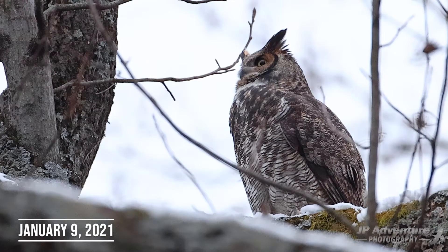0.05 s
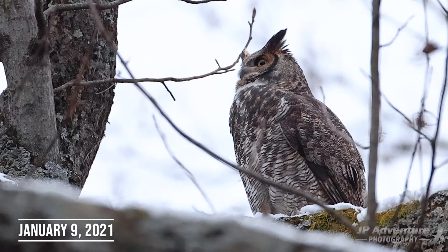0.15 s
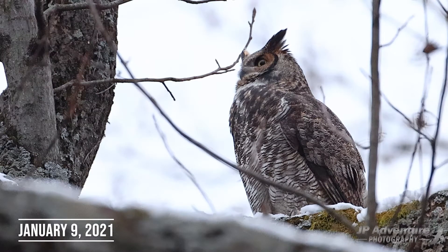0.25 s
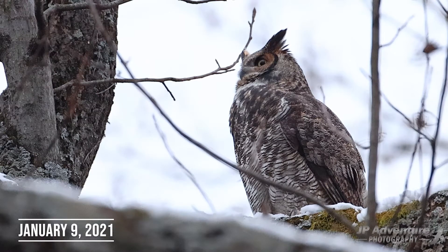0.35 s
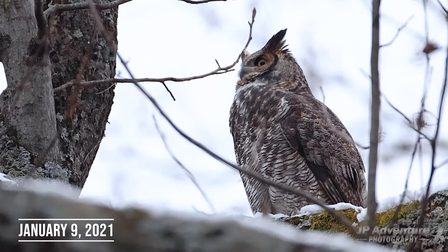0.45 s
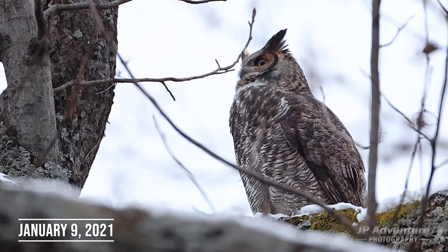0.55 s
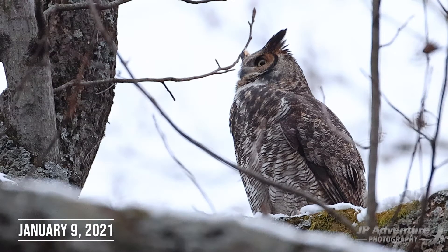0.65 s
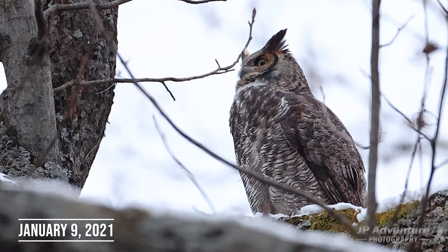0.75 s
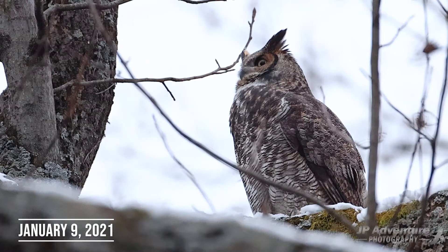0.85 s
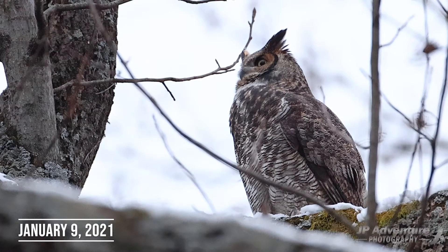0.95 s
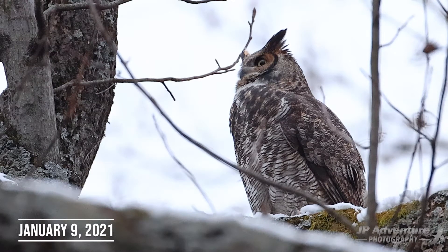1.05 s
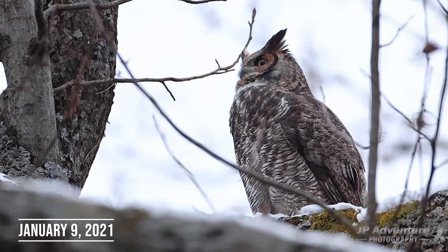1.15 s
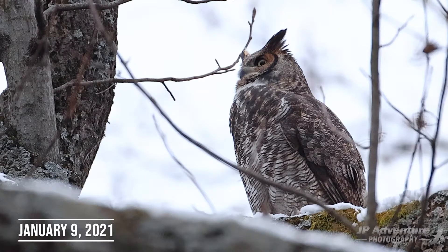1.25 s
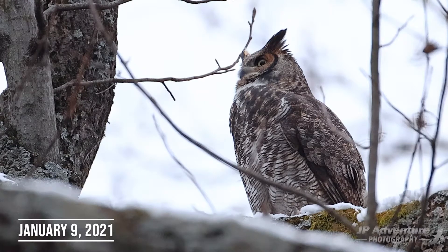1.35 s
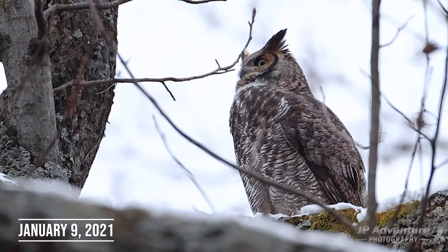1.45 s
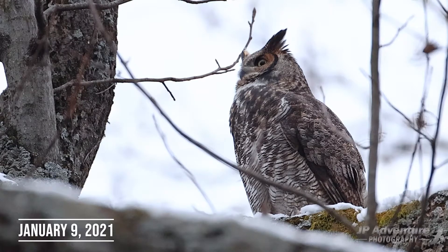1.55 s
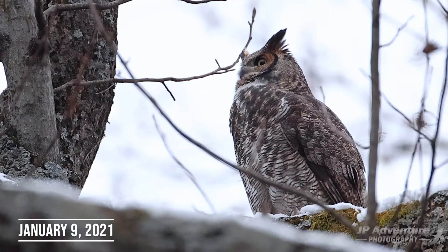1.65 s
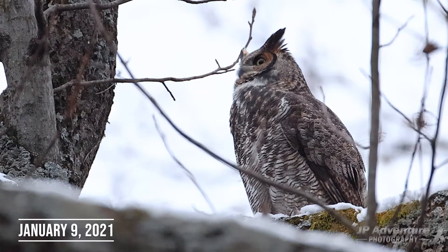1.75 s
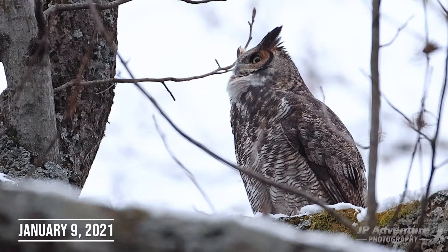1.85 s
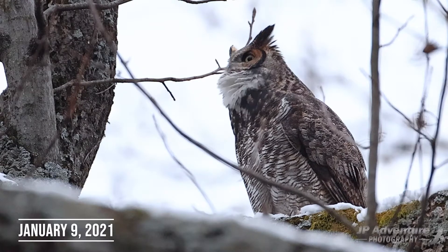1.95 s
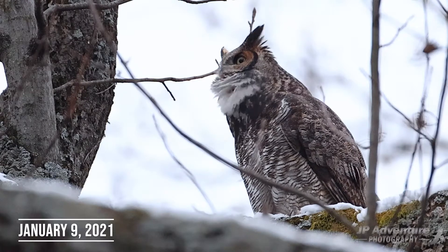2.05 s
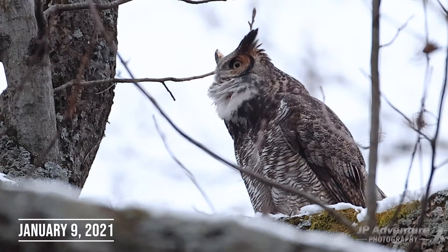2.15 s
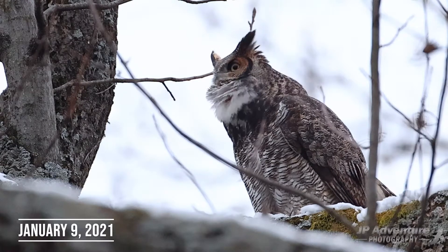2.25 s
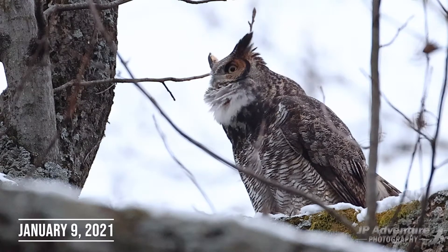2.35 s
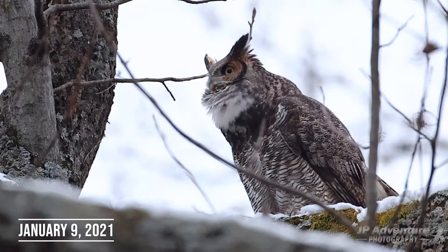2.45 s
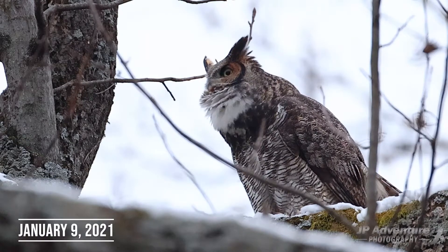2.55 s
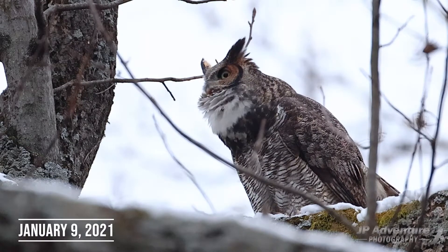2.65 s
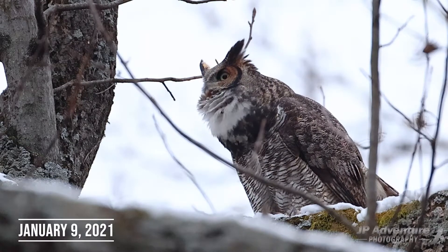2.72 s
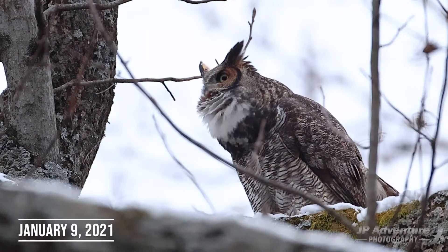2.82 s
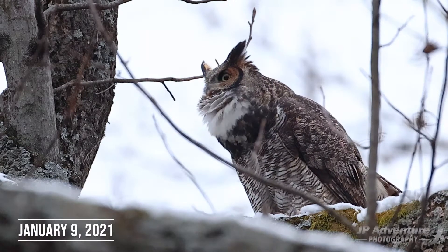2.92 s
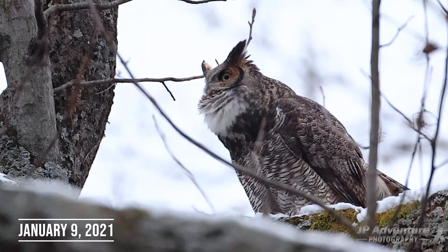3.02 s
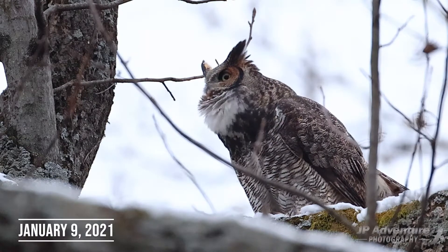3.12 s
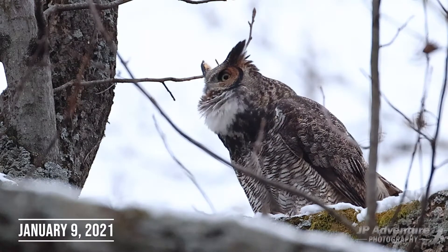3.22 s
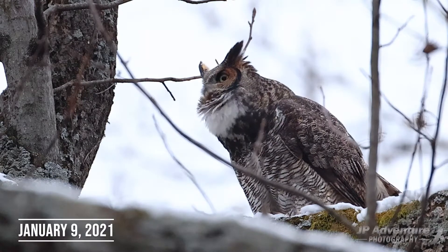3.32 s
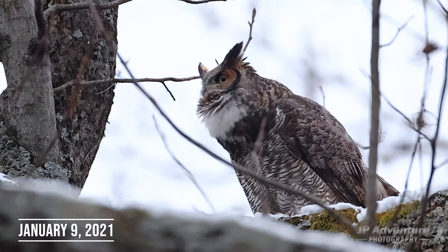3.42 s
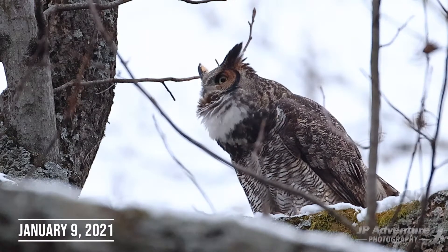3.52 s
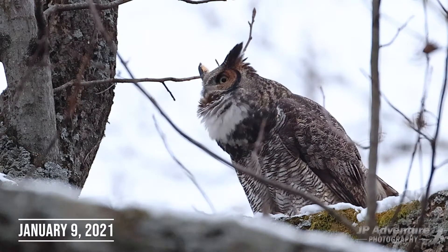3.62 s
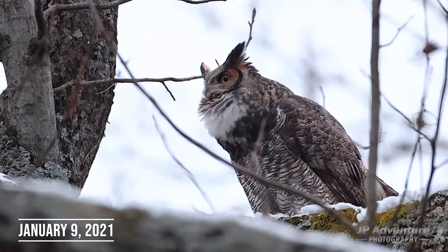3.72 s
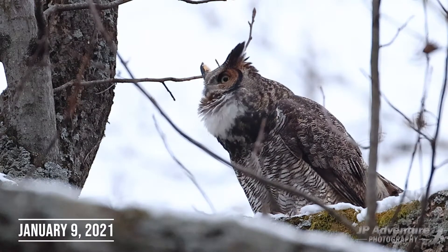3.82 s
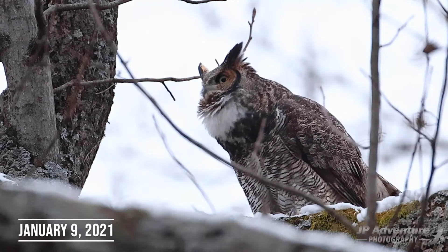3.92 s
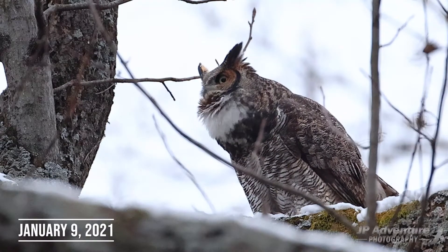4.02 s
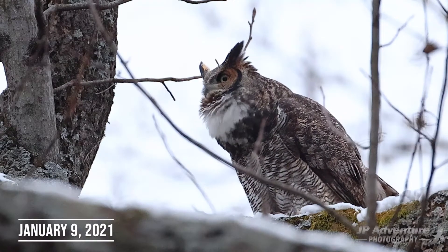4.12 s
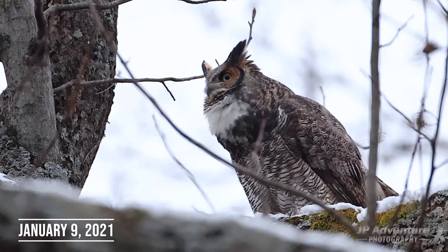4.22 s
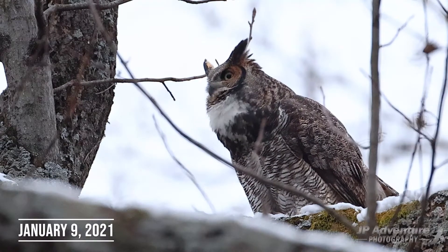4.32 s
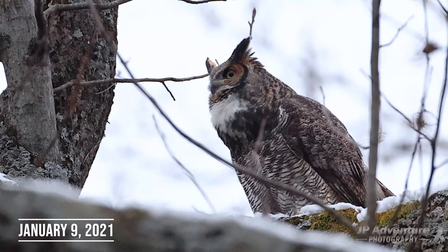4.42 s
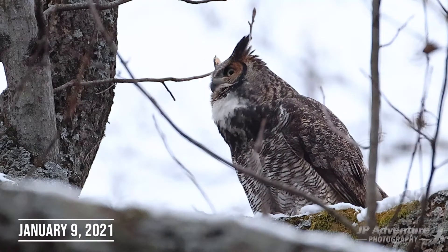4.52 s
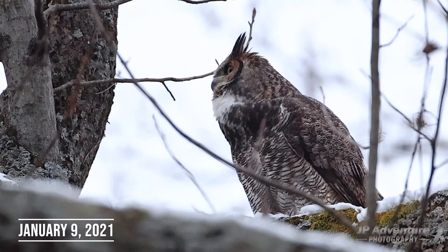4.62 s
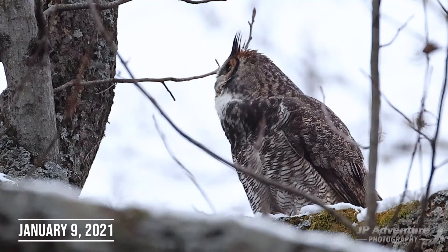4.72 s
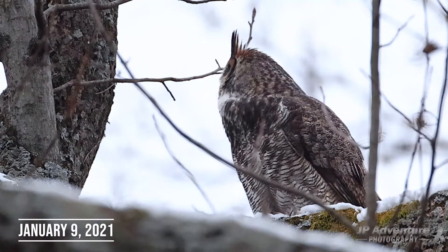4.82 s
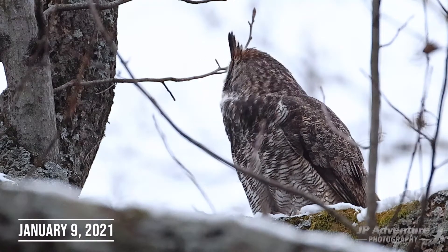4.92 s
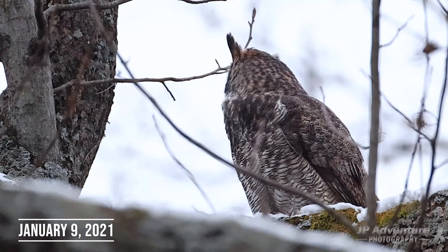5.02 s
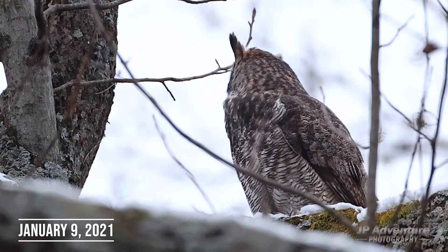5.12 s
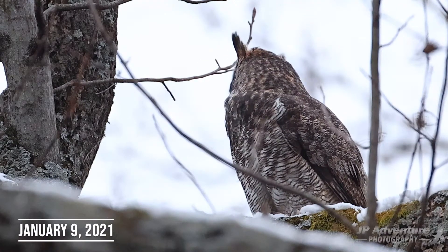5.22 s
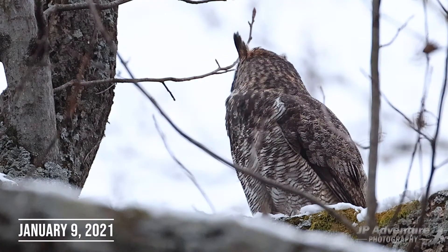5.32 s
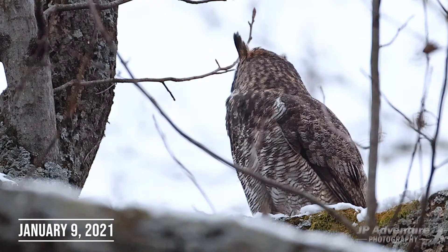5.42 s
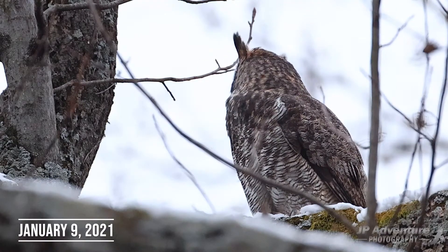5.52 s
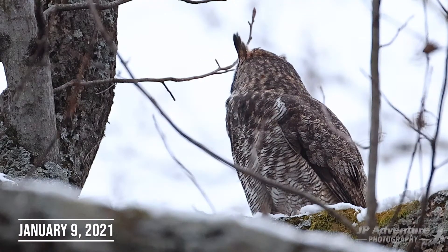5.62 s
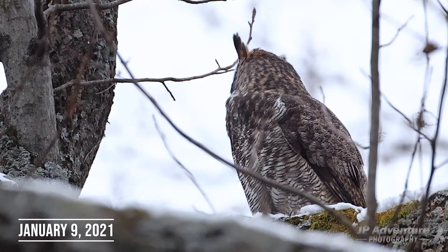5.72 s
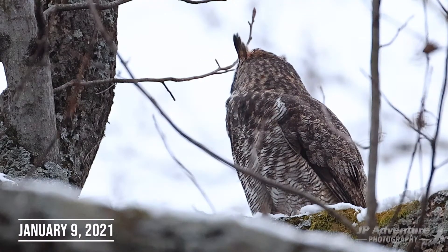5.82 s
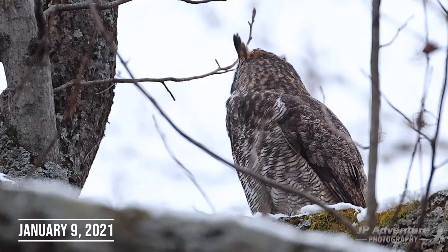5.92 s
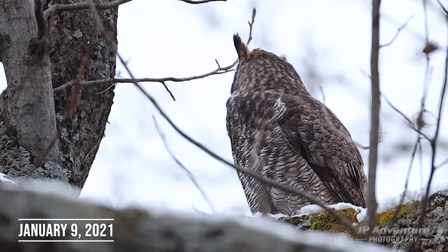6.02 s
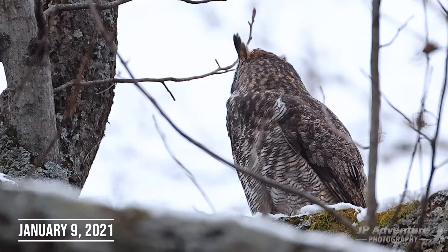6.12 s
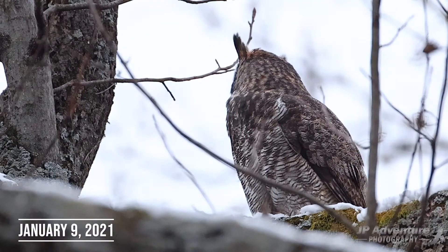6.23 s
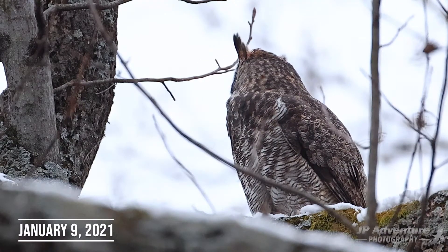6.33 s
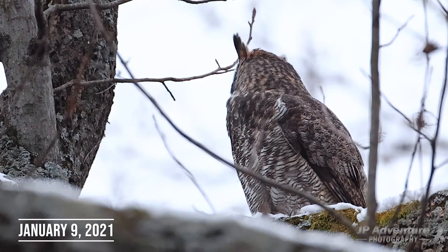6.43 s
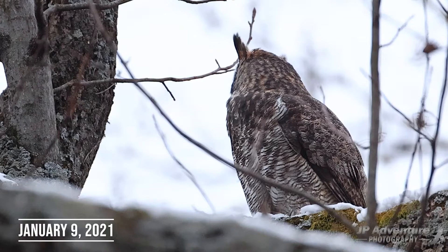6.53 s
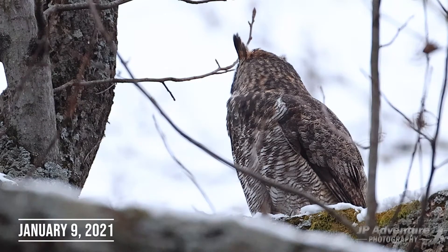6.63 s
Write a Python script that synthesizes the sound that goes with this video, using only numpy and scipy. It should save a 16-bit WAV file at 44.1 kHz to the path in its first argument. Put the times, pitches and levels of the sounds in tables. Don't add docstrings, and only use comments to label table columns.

```python
import sys
import numpy as np
from scipy import signal
from scipy.fft import rfft, irfft
from scipy.io import wavfile
from scipy.ndimage import uniform_filter1d

SR = 44100
rng = np.random.default_rng(int(sys.argv[2]) if len(sys.argv) > 2 else 0)


def waveform_to_disk(signal):
    frames = np.transpose(np.atleast_2d(signal))
    scaled = np.clip(frames, -1, 1) * 32767
    samples = np.round(scaled).astype(np.int16)
    wavfile.write(sys.argv[1], SR, samples)


def amplitude_ratio(level_db):
    exponent = np.asarray(level_db, float) / 20
    return 10 ** exponent


N = 294147
SKIP_AT_S, SKIP_S = 1.2713, .045


def evened(x):
    return x / np.sqrt(np.mean(x ** 2) + 1e-20)


def read(points, hz):
    f, value = np.transpose(points)
    return np.interp(np.log(hz + 1), np.log(f + 1), value)


def add(mix, s, sound):
    part = mix[round(s * SR):][:len(sound)]
    part += sound[:len(part)]


def resonate(x, hz, width):
    turn = np.exp(2j * np.pi * np.cumsum(hz * np.ones(len(x))) / SR)
    r = np.exp(-np.pi * width / SR)
    smooth = signal.lfilter([1 - r], [1, -r], x / turn + 1e-18)
    return 2 * (turn * smooth).real


def band(x, kind, hz):
    return signal.sosfilt(signal.butter(6, hz, kind, fs=SR, output="sos"), x)


def ducking():
    # (start [s], duration [s], drop
    # [dB])
    ducks = [(.785, 0.018, 6), (1.15, .04, 2.5), (1.27, 0.057, 5), (1.33, 0.27, 1), (2.2, 0.36, 5),
             (2.62, .03, 4), (2.65, 0.21, 0), (2.87, .11, 4.5), (3.422, .2, .5), (3.63, .2, 4.5),
             (4.17, 0.15, 1.5)]
    recover_db_per_s, ease_db = 12.5, 3
    t = np.arange(0, N / SR + .01, .005)
    start, lasts, drop_db = np.transpose(ducks)[:, :, None]
    done = np.diff(np.clip((t - start) / lasts, 0, 1), prepend=0)
    fall = (drop_db * done).sum(0)
    free = np.clip(.005 - (lasts * done).sum(0), 0, 1)
    gain = np.zeros(len(t))
    for k in range(1, len(t)):
        recovery = free[k] * recover_db_per_s * np.tanh(-gain[k - 1] / ease_db)
        gain[k] = gain[k - 1] - fall[k] + recovery
    return np.interp(np.arange(N) / SR, t, gain)


def background():
    # (frequency [Hz], density [dB per Hz])
    hum = [(12, -52.5), (20, -31), (48, -5.5), (98, 2), (210, -9.5), (277, -9.5), (310, -9), (377, -13),
           (642, -10), (949, -11), (1400, -17.5), (2530, -36), (11400, -44), (14700, -45), (16000, -51)]
    # (middle [s], half length [s], level [dB])
    gusts = [
        (1.2, .25, 1.5),
        (1.55, .15, 4),
        (2.5, .12, 3),
        (4.2, .15, 3),
        (5.15, .12, 1.5),
        (5.558, .13, 3.5),
    ]
    wind_hz, hiss_edge_hz = 207, 15930
    traffic_db, wind_db = -38.5, -33
    frames, hz, t = N // 512 + 5, np.fft.rfftfreq(2048, 1 / SR), np.arange(N) / SR
    a, b, patches = rng.standard_normal((frames, 1025, 3)).T
    patches = uniform_filter1d(patches, size=12, axis=0)
    patches = evened(uniform_filter1d(patches, size=8, axis=1))
    patchy_db = 0.87 / (1 + (hz[:, None] / 2500) ** 2)
    density = amplitude_ratio(read(hum, hz)[:, None] + patchy_db * patches)
    z = (a + 1j * b) * density * (hz < hiss_edge_hz)[:, None]
    low = 1 / (1 + (hz[:, None] / wind_hz) ** 6)
    wind, rest = (signal.istft(z * w, nperseg=2048, noverlap=1536)[1][:N] for w in (low, 1 - low))
    rest /= np.std(band(band(rest, "high", 1000), "low", 1500))
    wind = evened(band(wind, "high", 43))
    gusts_db = sum(db * np.exp(-((t - s) / half) ** 2) for s, half, db in gusts)
    return amplitude_ratio(ducking()) * (rest * amplitude_ratio(traffic_db) + wind * amplitude_ratio(wind_db + gusts_db))


def bumps():
    # (time [s], peak level [dB], frequency [Hz])
    pushes = [
        (5.185, -28, 170.2),
        (5.252, -25, 200),
        (5.276, -26, 190),
        (5.465, -23, 182),
        (5.487, -20.5, 164),
    ]
    out, t = np.zeros(N), np.arange(1200) / SR
    for s, db, hz in pushes:
        pulse = np.hanning(len(t)) ** 2 * np.cos(2 * np.pi * hz * t)
        add(out, s - .012, amplitude_ratio(db) * pulse)
    return out


def bird():
    # (start [s], length [s], level [dB], centre frequency [Hz])
    calls = [
        (1.133, .135, -46.5, 3500),
        (6.151, .21, -41, 3520),
    ]
    attack_s, scoop, fade_db, sag = 0.018, .86, 12, .035
    partials = [(.92, 0.6), (1.01, .9), (1.08, .7)]
    out = np.zeros(N)
    for s, length, db, centre_hz in calls:
        t = np.arange(0, length, 1 / SR)
        rise = np.minimum(t / attack_s, 1)
        hz = centre_hz * (scoop + (1 - scoop) * rise - sag * t / length)
        rasp = np.zeros(len(t))
        for share, gain in partials:
            air = rng.standard_normal(len(t))
            rasp += gain * resonate(resonate(air, hz * share, 150), hz * share, 150)
        envelope = rise ** 2 * amplitude_ratio(db - fade_db * t / length) * signal.windows.tukey(len(t), .1)
        add(out, s, envelope * evened(rasp))
    return out


def trees(seconds):
    # (frequency [Hz], decay time t60 [s])
    decay = [(200, 0.8), (500, 1.3), (1500, 0.24), (4000, 0.23), (9000, 0.21), (16000, 0.21)]
    taps = np.zeros(int(seconds * SR))
    at = np.arange(100, len(taps) - 20, 20)
    taps[at + rng.integers(0, 20, len(at))] = rng.choice([-1., 1.], len(at))
    hz, t, z = signal.stft(taps, SR, nperseg=256)
    return signal.istft(z * amplitude_ratio(-60 * t / read(decay, hz)[:, None]), SR, nperseg=256)[1]


def scatter():
    tail = band(trees(.3), "high", 1500)
    clumps = evened(uniform_filter1d(rng.standard_normal(len(tail)), size=120))
    tail = tail * amplitude_ratio(2.6 * clumps)
    return tail / np.linalg.norm(tail)


def causal(gain):
    log_gain = np.log(np.maximum(np.r_[gain, gain[-2:0:-1]], 1e-5))
    return np.exp(log_gain - 1j * signal.hilbert(log_gain).imag)[:len(gain)]


def snap(gain, length, wet_db, tail):
    t = np.arange(1024) / SR
    burst = rfft(rng.standard_normal(len(t)) * np.exp(-t / length))
    crack = irfft(burst / causal(abs(burst)) * causal(gain))
    crack = crack + 0.24 * np.roll(crack, shift=64)
    smooth_gain = np.sqrt(abs(uniform_filter1d(gain ** 2, size=28)))
    sound = amplitude_ratio(wet_db) * signal.fftconvolve(irfft(causal(smooth_gain)), tail)
    sound[:len(t)] += crack
    return sound / abs(crack).max()


def ticks(tails):
    # (time [s], peak level [dB], ring
    # frequency [Hz])
    close = [(0.2158, -26, 5600), (.3263, -33, 5530), (1.483, -45, 7000), (2.030, -19, 5200),
             (2.6076, -36, 9000), (2.873, -19, 5500), (2.8805, -13, 3790), (3.3546, -35.5, 5500),
             (3.413, -22.5, 5000), (4.1336, -42, 5000), (4.204, -49, 6530), (4.242, -46, 6500),
             (4.2513, -36, 5000), (4.267, -45.5, 6300), (4.9065, -23, 3020), (5.003, -31, 5000),
             (5.1184, -41, 3970), (5.697, -37, 6500), (6.29, -26, 3980), (6.326, -33, 6500)]
    # (time [s], peak level [dB], ring frequency [Hz])
    icy = [
        (1.2728, -33, 5360),
        (2.8678, -27, 12900),
        (4.88, -26, 2800),
    ]
    # (time [s], peak level [dB], ring frequency [Hz])
    distant = [
        (3.372, -34.5, 4500),
        (4.188, -42.5, 5000),
        (4.889, -29, 4510),
        (4.968, -34.5, 5500),
        (5.567, -34, 6450),
        (5.592, -27, 5000),
        (5.628, -33, 4500),
    ]
    # (ring width [share of frequency], scatter level [dB])
    kinds = [
        (.45, -6),
        (.13, -9.5),
        (0.55, 9),
    ]
    out, hz = np.zeros(N), np.fft.rfftfreq(1024, 1 / SR)
    for events, (share, wet_db) in zip((close, icy, distant), kinds):
        for k, (s, db, ring_hz) in enumerate(events):
            ring = np.exp(-((hz / ring_hz - 1) / share) ** 2)
            add(out, s, amplitude_ratio(db) * snap(ring, 0.00026, wet_db, tails[k % len(tails)]))
    return out


def snaps(tails):
    # (time [s], peak level [dB], crack length [s], scatter level [dB])
    cracks = [
        (1.9264, -2, 0.00066, -6.5),
        (2.039, -7, .0006, -7),
        (2.867, -3, .0016, -9),
        (3.4007, -9.5, 0.00055, -8),
        (4.9008, -16, 0.000795, -3.5),
        (5.556, -28.5, 0.00089, 13),
    ]
    # (frequency [Hz], density [dB per Hz])
    colours = [
        [(880, -38), (1690, 2.5), (1880, -13.5), (2570, -3), (3720, 1.5), (4170, -8.5), (6890, -10),
         (8300, -31), (16000, -96)],
        [(1530, -32), (3030, -11), (3770, -10.5), (4420, 3), (5310, -13), (5920, 3.5), (7360, -12), (8010, -26),
         (16000, -100)],
        [(1300, -34.5), (1840, 1), (2260, -27), (2580, -0.5), (3300, 0.5), (6080, -17), (7300, -2.5),
         (10100, -20), (16000, -51.5)],
        [(1410, -35), (2630, -7), (3140, 6), (4230, 0), (4680, -5.5), (5170, 0.5), (6760, -6.5), (9300, -25.5),
         (15000, -31)],
        [(1240, -38), (2100, -13), (2480, 5.5), (2780, -7), (4300, -10.5), (7230, -8.5), (7800, -14.5),
         (10700, -11.5), (13000, -28)],
        [(1180, -34), (2000, 2), (3090, -9), (3940, -4), (4770, -16), (6860, -5), (8300, -26), (10800, -54),
         (16000, -100)],
    ]
    out, hz = np.zeros(N), np.fft.rfftfreq(1024, 1 / SR)
    for (s, db, length, wet_db), colour, tail in zip(cracks, colours, tails):
        add(out, s, amplitude_ratio(db) * snap(amplitude_ratio(read(colour, hz)), length, wet_db, tail))
    return out


def gesture(notes, onset, ending, rules):
    slurred_sag = (0.3, 0.9)
    break_db = 8
    overshoot, settle_s = .03, .035
    attack, release, slur, rest_hz, drift, arch, droop = rules
    rows = []
    for s, syllables in notes:
        s = s + SKIP_S * (s > SKIP_AT_S)
        _, hz, db, _ = syllables[0]
        rows = [r for r in rows if r[0] < s - .004]
        rows += [(s - .004, hz * onset[0][1], -90)]
        rows += [(s + a * attack, hz * p, db + d) for a, p, d in onset]
        for k, (length, hz, db, sag_db) in enumerate(syllables):
            join, fall = min(slur, length / 3.5), min(release, length / 2)
            early, half = slurred_sag if k else (0, .62)
            if k:
                before_hz = rows[-1][1]
                rows += [(s + join, (before_hz + hz) / 2, db - break_db * (hz < .9 * before_hz))]
            first = s + (2 * join if k else attack)
            last = max(s + length - fall * (k == len(syllables) - 1), first + .002)
            end_hz = hz * (1 - droop * sag_db) + drift * (hz - rest_hz) * (last - first)
            sharp = k and hz > 1.05 * syllables[k - 1][1]
            if sharp and last - first > 2.2 * settle_s:
                rows += [(first + settle_s, hz, db - (early + half) / 2 * sag_db)]
            rows += [(first, hz * (1 + overshoot * sharp), db - early * sag_db)]
            rows += [((first + last) / 2, (hz + end_hz) / 2 * (1 + arch), db - half * sag_db)]
            rows += [(last, end_hz, db - sag_db)]
            s = s + length
        for a, p, d in ending:
            rows += [(last + a * fall, end_hz * (1 - (1 - p) * fall / release), db - sag_db + d)]
        rows += [(last + fall + .004, rows[-1][1], -90)]
    return np.transpose(sorted(rows))


def owl(course, octave_law, throat_db, slack_db):
    fill_s = .16
    octave_flutter_db, waver = 3, .006
    s, hz, level_db = course
    t = np.arange(N) / SR
    clock = t + SKIP_S * (t > SKIP_AT_S)
    hz, level = (uniform_filter1d(np.interp(clock, s, c), size=300) for c in (hz, amplitude_ratio(level_db)))
    flutter = uniform_filter1d(rng.standard_normal(N), size=700)
    flutter = evened(uniform_filter1d(flutter, size=700))
    slack = slack_db * np.exp(-((clock - s[0]) / fill_s) ** 4)
    octave = level * amplitude_ratio(read(octave_law, hz) + slack + octave_flutter_db * flutter)
    turn = 2 * np.pi * np.cumsum(hz * (1 + waver * flutter[::-1])) / SR
    turn += np.pi * (t > SKIP_AT_S) - turn[round(SKIP_AT_S * SR)]
    upper = np.cos(7 * turn + 1.5 * flutter) / (1 + ((7 * hz - 2570) / 110) ** 4)
    return np.sqrt(2) * (level * (np.cos(turn) + amplitude_ratio(throat_db) * upper) + octave * np.cos(2 * turn))


def far_owl():
    # (start [s], syllables of (length [s], pitch [Hz], level [dB], sag [dB]))
    hoots = [
        (.755, [(.14, 282, -12, 7)]),
        (1.127, [(.145, 283, -11.5, 6)]),
        (1.224, [(.054, 263, -16.5, 0), (0.22, 293, -17, -.5), (.125, 300, -21, 2.5)]),
        (2.315, [(.385, 279.5, -14, 4.5)]),
        (3.12, [(.25, 277.6, -22.5, 1.5)]),
    ]
    # (time [share of attack], pitch [share], level [dB])
    rise = [(0, .9, -27.5), (.45, .94, -8)]
    # (time [share of release], pitch [share], level [dB])
    decline = [(.35, 0.89, -15), (.7, .91, -13), (1, .88, -23)]
    # (attack [s], release [s], slur [s], resting pitch [Hz], drift from it [1/s], arch [share],
    # droop [share per dB of sag])
    rules = (.042, .05, .025, 280, 4, .015, .008)
    # (pitch [Hz], level re fundamental [dB])
    octave_law = [(255, -23.5), (280, -25.5), (300, -31.5)]
    return owl(gesture(hoots, rise, decline, rules), octave_law, throat_db=-53.0, slack_db=1)


def near_owl():
    # (start [s], syllables of (length [s], pitch [Hz], level [dB], sag [dB]))
    hoots = [
        (2.197, [(.081, 298, -17.5, -1.5), (.065, 256, -15.5, 0)]),
        (2.583, [(.142, 314, -13, 1.5)]),
        (2.746, [(.104, 322, -12, 2.5), (.274, 367.6, -10.5, 8)]),
        (3.497, [(.127, 315.7, -12.5, 6), (.25, 357, -9, 8.5)]),
        (4.083, [(.124, 320.3, -13.5, 0.5), (.152, 352, -10.5, 3)]),
    ]
    # (time [share of attack], pitch [share], level [dB])
    rise = [(0, .66, -31.5), (.45, .92, -9.5)]
    # (time [share of release], pitch [share], level [dB])
    decline = [(.25, .86, -6.5), (.6, .72, -13.5), (1, .62, -27.5)]
    # (attack [s], release [s], slur [s], resting pitch [Hz], drift [1/s],
    # arch [share], droop [share per dB])
    rules = (0.0563, .07, .023, 336, 6, .01, 0)
    # (pitch [Hz], level re fundamental [dB])
    octave_law = [(250, -14.5), (295, -22.5), (320, -34.5), (390, -32.5)]
    return owl(gesture(hoots, rise, decline, rules), octave_law, throat_db=-50, slack_db=12)


def owl_echo(near, far):
    turn_s, turn_db = 4.05, 4
    tail = band(np.r_[np.zeros(1500), trees(1.2)], "low", 800)
    tail = signal.lfilter(*signal.butter(2, 330, "high", fs=SR), tail)
    tail *= 1 + 0.5 * np.exp(-np.arange(len(tail)) / SR / 0.027)
    near_db = -30 + turn_db * (np.arange(N) > turn_s * SR)
    sent = amplitude_ratio(near_db) * near + amplitude_ratio(-31.5) * far
    return signal.fftconvolve(sent, tail / np.linalg.norm(tail))[:N]


def scene():
    tails = [scatter() for _ in range(6)]
    floor = background() + bumps()
    wood = ticks(tails) + snaps(tails)
    far, near = far_owl(), near_owl()
    return (floor + bird() + wood + far + near + owl_echo(near, far))[None]


def low_pass(x):
    return signal.sosfilt(signal.butter(12, 16650, fs=SR, output="sos"), x)


def record(dry):
    limited = signal.oaconvolve(dry, signal.firwin(255, 16500, fs=SR)[None], "same")
    return low_pass(limited)


dry = scene()
out = record(dry)
waveform_to_disk(out)
```